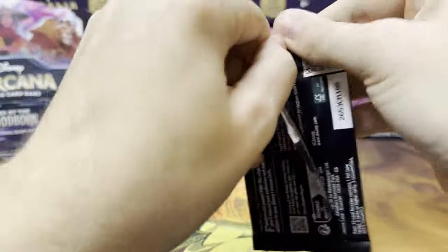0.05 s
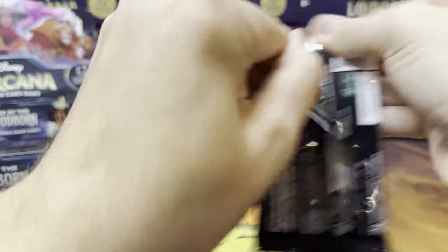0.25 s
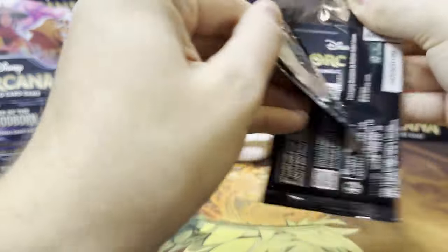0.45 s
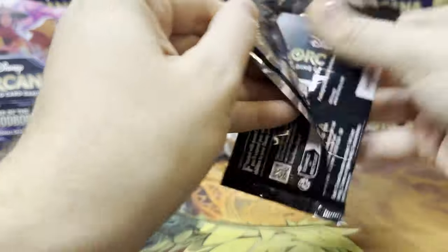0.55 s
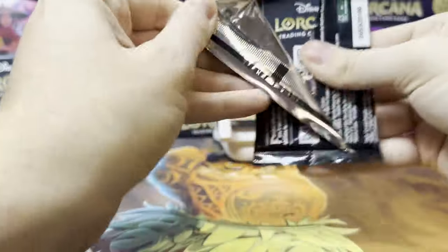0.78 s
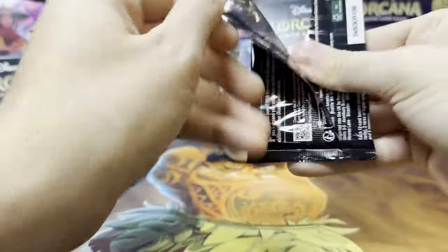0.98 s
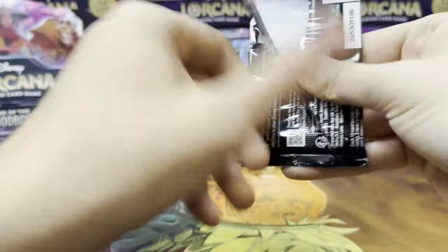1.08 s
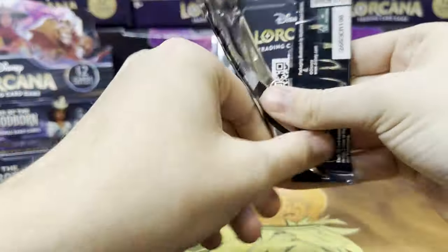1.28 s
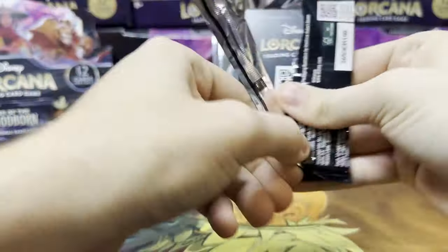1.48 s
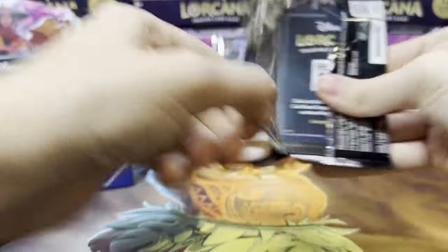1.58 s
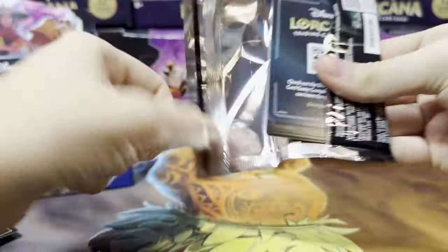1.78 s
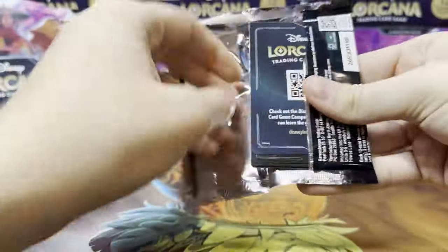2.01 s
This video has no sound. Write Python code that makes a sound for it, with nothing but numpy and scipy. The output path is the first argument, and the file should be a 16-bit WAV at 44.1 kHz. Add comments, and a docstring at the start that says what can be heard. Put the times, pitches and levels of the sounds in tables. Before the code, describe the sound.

Thin plastic-foil wrapper crackles, ticks and rips apart in two bursts in a small quiet room

```python
"""Two hands peel open a foil card pack close to a two-port microphone, in a small quiet room.
First come faint creases and a run of tiny ticks as the glued seam lets go, then a big rip with sharp snaps.
More seam ticks follow while the loosened flap crumples; after a sparse stretch comes the second big rip,
then a few last creases. Creases are short noise bursts with ringing pops, crinkling is many tiny rings and
grains of noise; under them lie handling rumble, puffs of air from the jerking hands and a faint hush."""
import sys
import numpy as np
from scipy import signal
from scipy.fft import rfft, irfft, next_fast_len
from scipy.io import wavfile
from scipy.ndimage import uniform_filter1d

SR = 44100
rng = np.random.default_rng(int(sys.argv[2]) if len(sys.argv) > 2 else 0)


def log_audio(samples):
    """Write samples as a 16-bit WAV file to the path given in sys.argv[1]."""
    # one column per channel
    frames = np.atleast_2d(samples).T
    # limit to full scale, then quantise
    limited = np.clip(frames, -1, 1)
    pcm = np.round(limited * 32767).astype(np.int16)
    wavfile.write(sys.argv[1], SR, pcm)


N = 90404  # length in samples

# Part of the noise, pop or ring that the two microphone ports do not share.
APART_LOW, APART_CRACK, APART_FIZZ = 0.14, 0.6, 0.15


def amp(db):
    """Decibels to gain."""
    return 10 ** (np.asarray(db) / 20)


def unit(x):
    """Scale to rms 1."""
    return x / np.sqrt(np.mean(x ** 2) + 1e-20)


def along(points, hz):
    """Read a curve of (Hz, value) points on a log frequency axis."""
    point_hz, value = np.transpose(points)
    return np.interp(np.log(hz + 1), np.log(point_hz + 1), value)


def colour(x, points, size=1024):
    """Filter with the given (Hz, dB) spectrum; the folded cepstrum makes it causal, so attacks stay sharp."""
    hz = np.fft.rfftfreq(size, 1 / SR)
    cepstrum = irfft(np.log(amp(along(points, hz))))
    cepstrum[1:size // 2] *= 2
    cepstrum[size // 2 + 1:] = 0
    impulse = irfft(np.exp(rfft(cepstrum)))
    return signal.fftconvolve(x, impulse[None], axes=1)[:, :x.shape[1]]


def ports(n, apart):
    """Noise that the two microphone ports partly share."""
    shared, unshared = rng.standard_normal((2, n))
    return np.array([shared + apart * unshared, shared - apart * unshared])


def add(out, start_s, x):
    """Mix x into out from this time on."""
    i = max(0, round(start_s * SR))
    out[:, i:i + x.shape[-1]] += x[..., :max(0, N - i)]


def packed(x, db):
    """Give x the energy of one millisecond at this rms level."""
    return amp(db) * unit(x) * np.sqrt(SR / 1000 / x.shape[-1])


def steady(x, size=900):
    """Even out the slow level of a grain stream, keeping its spikes."""
    power = np.mean(x ** 2, axis=0)
    smooth = uniform_filter1d(uniform_filter1d(power, size), size)
    return x / np.sqrt(np.abs(smooth) + 1e-12)


CREASE_SPREAD_DB = 2.5


def ragged(points, size=14):
    """Every crease has its own resonances: random peaks and valleys on a colour."""
    hz = np.geomspace(1000, 16500, size)
    db = along(points, hz) + CREASE_SPREAD_DB * rng.standard_normal(size)
    return [points[0], *zip(hz, db)]


# Resonances of the pouch, rung by every snap. Each row: pitch in Hz, level in dB, both before scatter
# and the level before POUCH_DB.
POUCH_MODES = [(510, -13), (660, -3.5), (930, -2), (1200, -1), (1750, 0.5), (2900, -4)]
# Colour of the crack, also used for wrinkles. Each row: frequency in Hz, level in dB.
CRACK_COLOUR = [(1400, -24.5), (2200, -2), (3200, 3.5), (4500, 4), (6500, 0.5), (12000, -15)]
# Colour of the fizz on top. Each row: frequency in Hz, level in dB.
FIZZ_COLOUR = [(4000, -30), (6500, -2.5), (7700, -2.5), (8600, 2.5), (9700, 2), (12400, -5.5), (14200, -6),
               (15700, -5), (16600, -30)]
CRACK_RISE_S, CRACK_FALL_S = 0.00045, 0.0007
RATTLE_DB, RATTLE_FALL_S = -10, 0.0025
POP_RISE_S, POP_LOW_HZ, CREASE_T60_S = 0.0002, 385, 0.018
POUCH_DB, POUCH_T60_S, POP_SCATTER_DB, MODE_DETUNE = -9, 0.023, 4, 0.049


def snap(hz, pop_db, crack_db, fizz_db, lead_s):
    """A crease flips: a sharp crack, a short rattle, and a pop at its own pitch that also rings the pouch."""
    t = np.arange(SR // 25) / SR - lead_s  # the crack swells up just before time 0
    after = np.maximum(t, 0)
    onset = np.exp(np.minimum(t, 0) / CRACK_RISE_S)
    rattle = amp(RATTLE_DB) * np.exp(-after / RATTLE_FALL_S)
    burst = onset * (np.exp(-after / CRACK_FALL_S) + rattle)

    ring = np.sin(2 * np.pi * hz * after) * amp(-60 * after / CREASE_T60_S)
    body = np.zeros(len(t))
    for mode_hz, db in POUCH_MODES:
        level = amp(db + POP_SCATTER_DB * rng.normal())
        detuned_hz = mode_hz * (1 + MODE_DETUNE * rng.normal())
        body += level * np.sin(2 * np.pi * detuned_hz * after)
    lean = 1 + APART_LOW * rng.normal() * np.array([[2], [-2]])  # the body leans to one port
    body = body * amp(POUCH_DB - 60 * after / POUCH_T60_S) * lean
    highpass = signal.butter(2, POP_LOW_HZ, "high", fs=SR, output="sos")
    pop = signal.sosfilt(highpass, (ring + body) * (1 - np.exp(-after / POP_RISE_S)))

    crack = colour(burst * ports(len(t), APART_CRACK), ragged(CRACK_COLOUR))
    fizz = colour(burst * ports(len(t), APART_FIZZ), FIZZ_COLOUR)
    return packed(pop, pop_db) + packed(crack, crack_db) + packed(fizz, fizz_db)


LEAD_S = 0.002  # each snap is laid in this much early, to leave room for its rise

# Buckling creases, levels as if packed into one millisecond. Each row: time in seconds, crease pitch in Hz,
# pop level in dB, crack level in dB, fizz level in dB.
SNAPS = [(0.0308, 1230, -42, -31.5, -24), (0.0551, 940, -29.5, -34, -33), (0.0626, 1850, -32.5, -26, -27),
         (0.0804, 930, -44.5, -35.5, -24.5), (0.1642, 850, -46.5, -38, -23.5), (0.1877, 846, -54, -37, -27),
         (0.218, 1210, -31.5, -22, -11), (0.2293, 1640, -26.5, -18, -24), (0.2413, 1810, -18.5, -17, -18),
         (0.2571, 1640, -26, -37, -16), (0.273, 1160, -22, -20, -16), (0.2782, 1770, -18, -11.5, -11),
         (0.294, 980, -9.5, -15.5, -15.5), (0.3524, 1220, -29, -27.5, -27),
         (0.4255, 1090, -39.5, -41, -28.5), (0.448, 466, -34.5, -32, -68), (0.458, 1160, -38, -27, -20.5),
         (0.49, 970, -30, -23, -25), (0.4989, 1200, -29, -27, -23), (0.6037, 880, -24, -25.5, -25.5),
         (0.606, 5120, -28, -26.5, -39), (0.6284, 3000, -28, -24.5, -36), (0.6932, 1660, -35.5, -51, -17),
         (0.7092, 1125, -21.5, -21.5, -13.5), (0.7192, 1730, -28, -20.5, -20),
         (0.7694, 1100, -35.5, -34.5, -25.5), (0.9126, 1860, -34.5, -40.5, -55),
         (0.9444, 1130, -36.5, -35, -27), (0.9647, 780, -29, -45, -50), (0.9915, 1120, -30.5, -26.5, -54),
         (1.128, 1670, -39.5, -36, -61), (1.2024, 1670, -36.5, -37.5, -31.5), (1.204, 627, -33, -43.5, -45),
         (1.3204, 1100, -28, -35, -34), (1.3803, 1150, -33, -42.5, -60), (1.447, 1504, -55, -31.5, -24.5),
         (1.4651, 1820, -62, -42, -24), (1.482, 1700, -26.5, -18.5, -15), (1.4992, 3470, -19, -8.5, -28),
         (1.5192, 530, -22.5, -14, -25), (1.538, 1810, -21.5, -16, -15), (1.5458, 953, -13.5, -31, -17.5),
         (1.569, 1770, -22.5, -34, -46), (1.5787, 680, -13, -17.5, -23), (1.5838, 1170, -17.5, -11, -10),
         (1.586, 513, -12, -18, -37), (1.593, 1670, -24, -20, -15), (1.5988, 556, -11.5, -18, -16.5),
         (1.636, 796, -13, -23.5, -16.5), (1.6547, 630, -23.5, -30.5, -51), (1.676, 1180, -28, -27.5, -41),
         (1.7266, 1020, -14, -21, -14), (1.7443, 1700, -23.5, -31, -16), (1.7687, 460, -27, -22, -17),
         (1.7794, 2270, -22.5, -17, -13.5), (1.781, 630, -25, -22, -22.5), (1.984, 1940, -44.5, -34, -28),
         (2.0098, 383, -30, -34.5, -27.5)]


def single_snaps(out):
    """Creases buckle one by one, each with its own pitch and levels."""
    for start_s, *tone in SNAPS:
        add(out, start_s - LEAD_S, snap(*tone, LEAD_S))


# The loosened flap. Each row: time in seconds, pop level in dB as if packed into one millisecond.
CRUMPLES = [(0.741, -29.5), (0.751, -29), (0.788, -30), (0.812, -30), (0.834, -29.5)]
CRUMPLE_HZ, CRUMPLE_CRACK_DB = 520, -51  # the fizz has the crack's level


def flap_crumples(out):
    """The loosened flap crumples softly: low pops with hardly any crack."""
    for start_s, pop_db in CRUMPLES:
        add(out, start_s - LEAD_S, snap(CRUMPLE_HZ, pop_db, CRUMPLE_CRACK_DB, CRUMPLE_CRACK_DB, LEAD_S))


# Runs of the peeling seam. Each row: start in seconds, end in seconds, ticks per second at the start,
# ticks per second at the end.
PEELS = [(.0685, .106, 160, 163), (.11, .159, 146, 106), (.667, .7, 155, 240), (.731, .85, 108, 84)]
# Ticks of each of these runs. Each row: crease pitch in Hz before scatter, then the levels in dB
# of pop and crack, before scatter and as if packed into one millisecond.
PEEL_TONES = [(1180, -48, -44), (1030, -48, -43), (1100, -50, -34.5), (520, -46, -43)]
PEEL_JITTER = 0.06  # spread of the tick spacing, as a fraction of it
TICK_FIZZ_DB, TICK_SCATTER_DB = 10, 1.5  # fizz above crack, spread from tick to tick


def seam_ticks(out):
    """The glue sticks and slips, letting the seam go in runs of nearly even ticks."""
    for (start, end, first, last), (hz, pop_db, crack_db) in zip(PEELS, PEEL_TONES):
        s = start
        while s < end:
            scatter_db = TICK_SCATTER_DB * rng.normal()
            levels = np.array([pop_db, crack_db, crack_db + TICK_FIZZ_DB]) + scatter_db
            add(out, s - LEAD_S, snap(hz * rng.uniform(0.89, 1.04), *levels, LEAD_S))
            jitter = 1 + PEEL_JITTER * np.clip(rng.normal(), -2, 2)
            s += jitter / np.interp(s, [start, end], [first, last])


GRAINS_PER_S, GRAIN_SPREAD_DB = 900, 4
RUB_DB = -5.5  # rub of film on film, added to the grains or rings


def crackle(points, apart, size=14):
    """Countless tiny cracks of uneven size over the rub of film on film."""
    struck = rng.random(N) < GRAINS_PER_S / SR
    hits = struck * amp(GRAIN_SPREAD_DB * np.minimum(rng.exponential(size=N), 4))
    grains = unit(uniform_filter1d(hits, size) * ports(N, apart))
    return steady(colour(grains + amp(RUB_DB) * ports(N, apart), points))


FLEX_OCTAVES, FLEX_CYCLES = 0.65, 13  # spread of facet pitch, cycles in which a ring falls 60 dB


def flexing(pitch, per_s, points, apart, count=5000):
    """Small facets of the sheet pop over, each with its own short ring, over the rub of the film."""
    u, z = rng.random((count, 2)), rng.standard_normal((count, 3))
    t = np.arange(SR // 70) / SR
    centre_hz = np.interp(u[:, :1] * N / SR, *np.transpose(pitch))
    hz = centre_hz * 2 ** (FLEX_OCTAVES * np.clip(z[:, :1], -2, 2))
    sounding = u[:, 1:] < per_s * N / SR / count  # keep only enough facets for the rate
    rings = np.sin(2 * np.pi * hz * t) * amp(-60 * hz * t / FLEX_CYCLES) * np.sqrt(hz) * sounding
    at = ((u[:, :1] * N).astype(int) + np.arange(len(t))).ravel()
    pair = []
    for side in (1, -1):
        strength = z[:, 1:2] + side * apart * z[:, 2:]
        pair.append(np.bincount(at, (rings * strength).ravel(), N)[:N])
    return steady(colour(unit(np.array(pair)) + amp(RUB_DB) * ports(N, apart), points))


# Fine crinkling under the pull. Each row: time in seconds, level of the flexing sheet in dB,
# level of the crackle in dB, both before the trims below.
CRINKLE = [(0.05, -53, -52), (0.16, -66, -72), (0.205, -77, -62.5), (0.227, -30.5, -27),
           (0.272, -21.5, -26.5), (0.311, -38, -36), (0.39, -57.5, -55), (0.441, -79, -64),
           (0.486, -41, -40), (0.533, -39, -41.5), (0.554, -64.5, -60.5), (0.611, -48, -40.5),
           (0.655, -58, -53.5), (0.721, -33.5, -38.5), (0.758, -56.5, -51), (0.84, -56, -50),
           (0.891, -65, -63.5), (0.953, -43.5, -47.5), (1.003, -42.5, -47.5), (1.04, -59, -54),
           (1.267, -66, -67.5), (1.282, -52.5, -49.5), (1.387, -56, -60.5), (1.409, -94, -69.5),
           (1.475, -45, -41), (1.503, -34, -28), (1.55, -31, -24.5), (1.597, -25, -27.5),
           (1.617, -45.5, -39.5), (1.66, -38, -44.5), (1.705, -43.5, -50), (1.783, -48, -38.5),
           (1.83, -55.5, -56), (1.973, -53, -59.5), (2.012, -46, -59)]
# Facets ring higher while the film is taut. Each row: time in seconds, middle pitch in Hz.
FACET_PITCH = [(0.18, 950), (0.25, 1700), (0.33, 954), (0.78, 590), (1.0, 1050), (1.55, 1690), (1.6, 870),
               (1.9, 636)]
# Colour of the flexing sheet. Each row: frequency in Hz, level in dB.
SHEET_COLOUR = [(130, -14), (300, -4), (520, -1.5), (750, 0.5), (1150, 6), (1430, -3), (1780, 6.5),
                (2300, -1), (3500, -8.5)]
FLEX_PER_S, WRINKLES_PER_S, WRINKLE_HZ = 600, 1900, 4100
SHEET_DB, CRACKLE_DB, SIZZLE_DB = -3.5, -2, -1  # trims of facets, wrinkles and fizz
DULLING, EVEN_DB = 0.25, -45  # a harder pull adds less fizz than crackle: dB lost per dB above this level


def crinkle():
    """The film flexes, crackles and fizzes as it is pulled."""
    s, *levels = np.transpose(CRINKLE)
    sheet_db, crack_db = [np.interp(np.arange(N) / SR, s, db) for db in levels]
    fizz_db = crack_db - DULLING * (crack_db - EVEN_DB)
    facets = flexing(FACET_PITCH, FLEX_PER_S, SHEET_COLOUR, APART_LOW)
    wrinkles = flexing([(0, WRINKLE_HZ)], WRINKLES_PER_S, CRACK_COLOUR, APART_CRACK)
    fizz = crackle(FIZZ_COLOUR, APART_FIZZ)
    film = amp(sheet_db + SHEET_DB) * facets + amp(crack_db + CRACKLE_DB) * wrinkles
    return film + amp(fizz_db + SIZZLE_DB) * fizz


# Low rumble of the handled pack. Each row: time in seconds, level in dB.
HANDLING = [(.2, -74), (.222, -38), (.27, -66), (.68, -69), (.9, -78), (1.2, -71), (1.45, -75), (1.56, -47),
            (1.76, -46), (1.85, -58.5), (1.99, -61), (2.02, -51.5)]
# Colour of that rumble. Each row: frequency in Hz, level in dB.
RUMBLE_COLOUR = [(25, -13.5), (70, 3.5), (330, -3.5), (700, -34)]


def handling():
    """The pack rumbles softly in the hands: low noise following a slow level curve."""
    level_db = np.interp(np.arange(N) / SR, *np.transpose(HANDLING))
    return amp(level_db) * steady(colour(ports(N, APART_LOW), RUMBLE_COLOUR))


# Jerks of the hands. Each row: start in seconds, peak level of the swell in dB, pitch in Hz.
JERKS = [(0.223, -27.5, 76), (1.794, -36, 79), (2.012, -43.5, 133)]
JERK_RISE_S, JERK_T60_S = 0.0009, 0.048


def air_puffs():
    """Each jerk of the hands pushes a puff of air: a low sine that swells fast and dies away."""
    out = np.zeros((2, N))
    s = np.arange(N) / SR
    swell = (1 - np.exp(-s / JERK_RISE_S)) * amp(-60 * s / JERK_T60_S)
    for start_s, db, hz in JERKS:
        add(out, start_s, amp(db) * swell / swell.max() * np.sin(2 * np.pi * hz * s))
    return out


# Decay of the small room. Each row: frequency in Hz, time to fall 60 dB in seconds.
ROOM_DECAY = [(8000, 0.26), (15000, 0.063)]
ROOM_DB, WALLS_DB = -21, -26  # tail, early echoes together


def room(x, count=8):
    """Weak early echoes from the table and boxes, over a short tail whose treble dies sooner."""
    hz, t, z = signal.stft(rng.standard_normal((2, SR // 3)), SR, nperseg=256)
    fading = z * amp(-60 * t / along(ROOM_DECAY, hz)[:, None])
    tail = signal.istft(fading, SR, nperseg=256)[1]
    echo = amp(ROOM_DB) * tail / np.linalg.norm(tail[0])
    for side in echo:
        delays = (rng.uniform(0.0015, 0.012, count) * SR).astype(int)
        side[delays] += amp(WALLS_DB) * rng.choice([-1, 1], count) / np.sqrt(count)
    return signal.fftconvolve(x, echo, axes=1)[:, :N]


# Colour of the faint background. Each row: frequency in Hz, level in dB.
HUSH_COLOUR = [(25, 4), (70, -7), (600, -33), (2000, -19.5), (16000, -32)]
HUSH_DB = -85.5


def hush():
    """A faint steady hush: coloured noise that the two ports partly share."""
    return amp(HUSH_DB) * unit(colour(ports(N, APART_CRACK), HUSH_COLOUR))


def scene():
    """The pack close by and its echo in the room, with rumble, puffs and hush added without echo."""
    pack = np.zeros((2, N))
    single_snaps(pack)
    flap_crumples(pack)
    seam_ticks(pack)
    pack += crinkle()
    return pack + room(pack) + handling() + air_puffs() + hush()


def filtered(x, response):
    """Multiply the spectrum of x by a complex response of frequency."""
    m = next_fast_len(N + SR // 4)
    return irfft(rfft(x, m) * response(np.fft.rfftfreq(m, 1 / SR)), m)[..., :N]


# Phase between the microphone ports. Each row: frequency in Hz, lead of the left port in radians.
PORT_LEAD = [(100, 0), (500, 0.15), (2000, 0.49), (3000, 0.98), (7200, 2.08), (8700, 0), (11200, -4),
             (16000, -6.5)]
# Level between the ports. Each row: frequency in Hz, left minus right in dB.
PORT_BALANCE = [(60, -.5), (300, -3), (1400, -3.2), (2500, -.8), (5000, .2), (7400, 3), (8800, 0)]
NOTCH_HZ, NOTCH_WIDTH_HZ, NOTCH_DB = 11300, 650, -14
TOP_HZ = 16500


def record(dry):
    """Two ports differ in phase and level and share a treble notch; nothing passes above the band limit."""
    side = np.array([[0.5], [-0.5]])  # each port takes half the difference

    def response(hz):
        """Complex gain of the two ports."""
        notch_db = NOTCH_DB * np.exp(-((hz - NOTCH_HZ) / NOTCH_WIDTH_HZ) ** 2)
        phase = np.exp(1j * side * along(PORT_LEAD, hz))
        return phase * amp(side * along(PORT_BALANCE, hz) + notch_db) * (hz < TOP_HZ)

    return filtered(dry, response)


dry = scene()
out = record(dry)
log_audio(out)
```